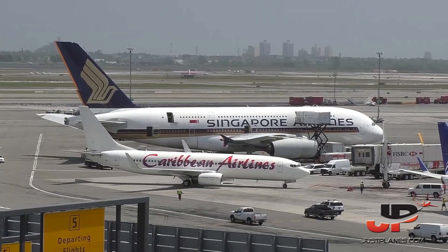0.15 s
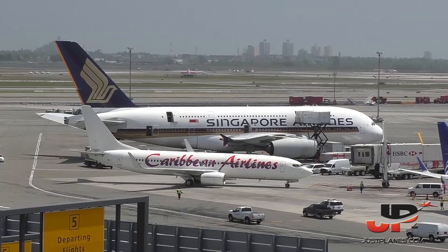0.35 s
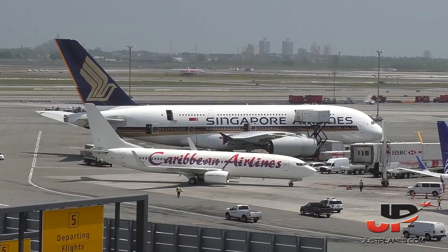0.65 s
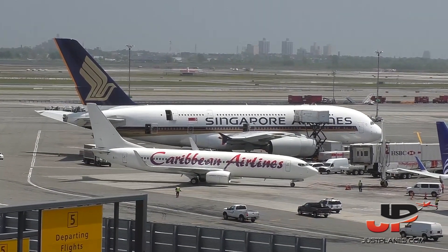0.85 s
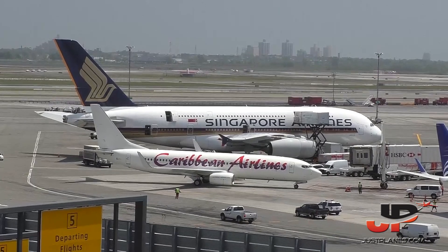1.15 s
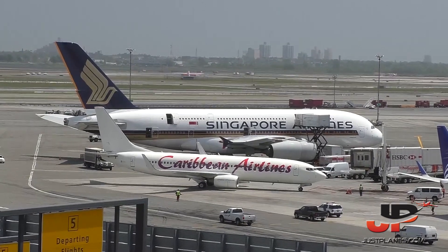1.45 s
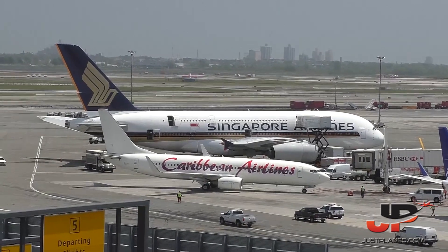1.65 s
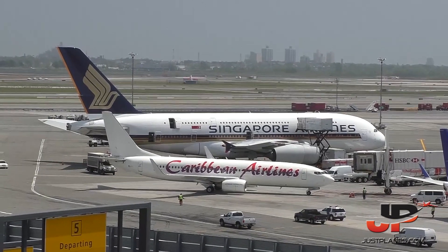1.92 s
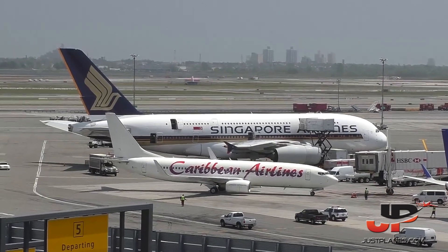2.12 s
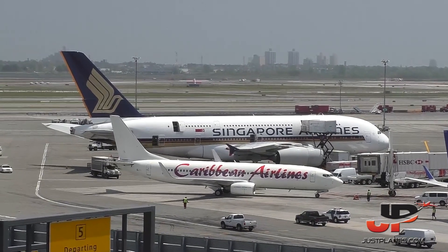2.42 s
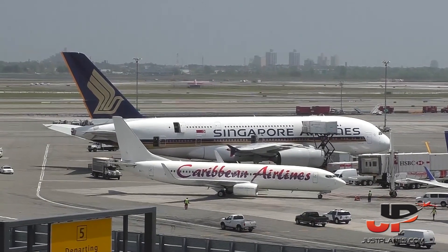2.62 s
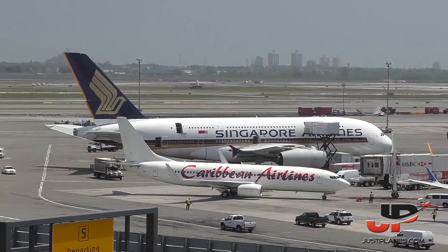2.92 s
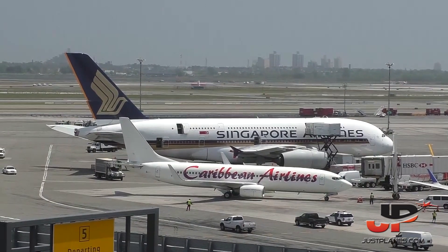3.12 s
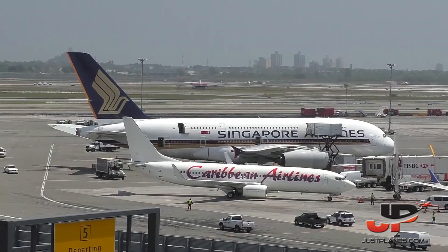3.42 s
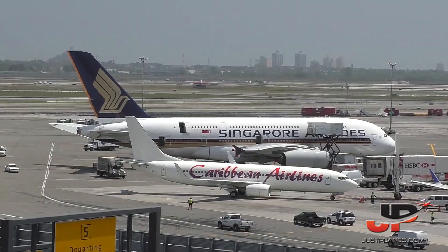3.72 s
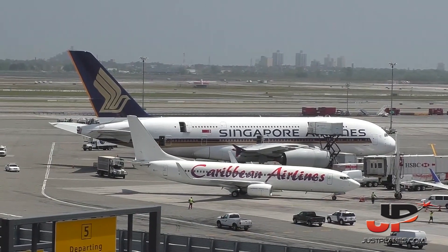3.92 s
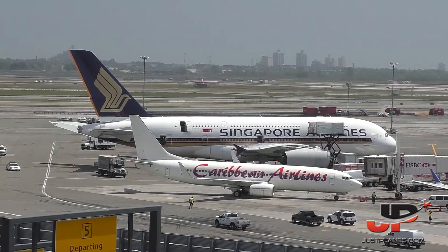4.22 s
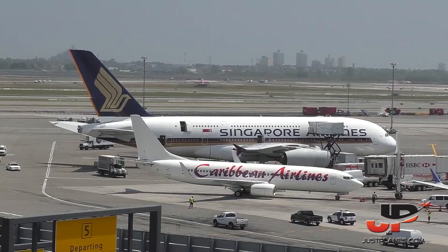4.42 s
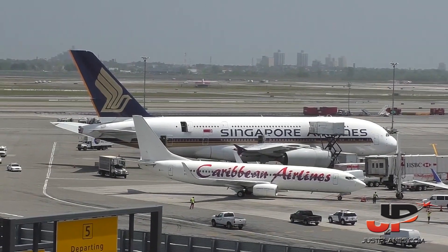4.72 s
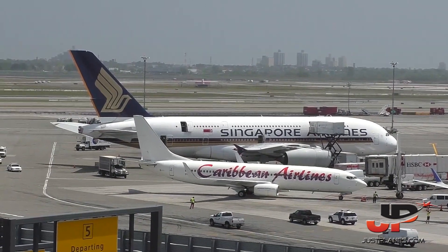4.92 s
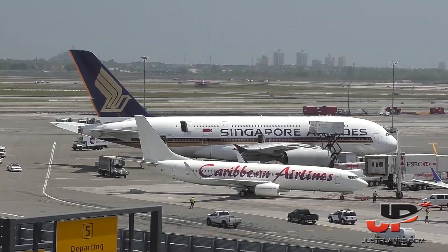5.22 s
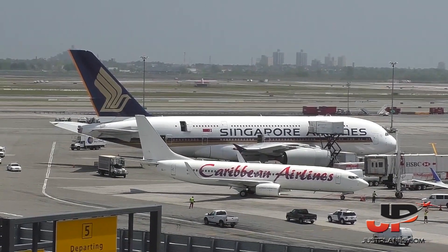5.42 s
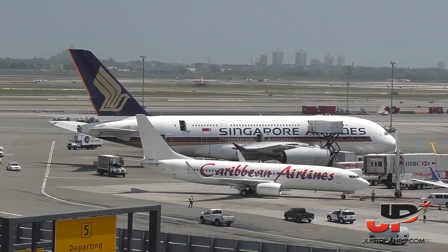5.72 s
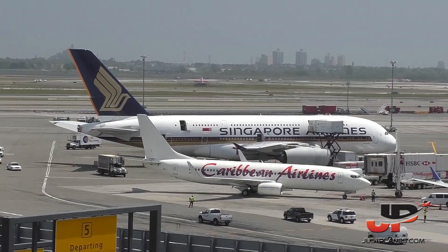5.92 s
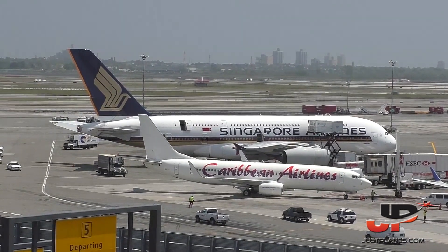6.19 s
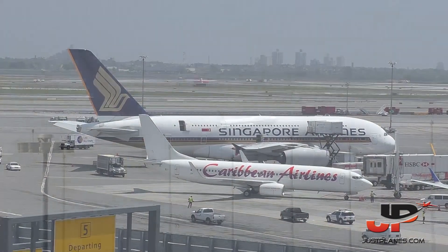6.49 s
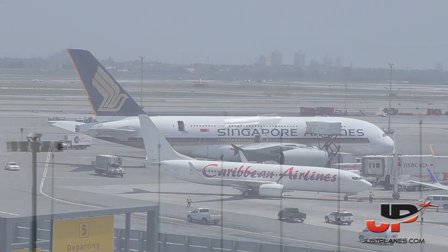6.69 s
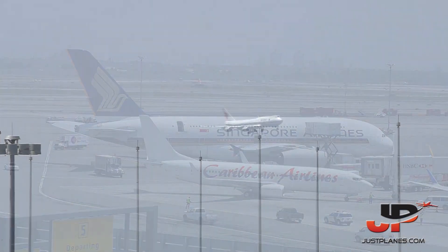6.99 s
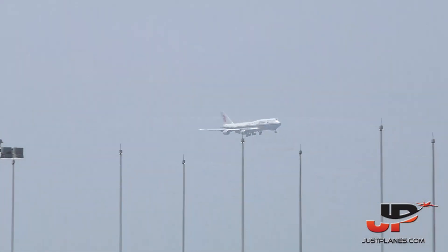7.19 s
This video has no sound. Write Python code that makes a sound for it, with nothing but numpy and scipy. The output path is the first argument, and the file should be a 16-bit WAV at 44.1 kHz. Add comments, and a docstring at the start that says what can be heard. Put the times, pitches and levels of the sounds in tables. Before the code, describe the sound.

From 0 s, a wide stereo jet roar fills an open airport apron, heard from a high terrace: low-mid rumble under broad hiss, with a blurred, flickering fan whine near 5.7 kHz and a faint tone near 800 Hz that swells around 1.2, 2.2 to 3.2, 3.7 and 5.6 s. Wind constantly buffets the microphone with very low swings, flutter and thumps, including hard slaps near 0.3, 1.0, 2.4, 3.0, 4.0 to 4.9 and 5.8 s. Tiny electrical pulse buzzes flick by at 0.19 and 4.81 s, stronger on the right. The roar wavers slightly, dips around 4.4 and 5.1, and grows fuller and brighter from 5.2 to 6.3 s as wind eases. Barely audible ticks come at 6.6. From 6.8 to 7.1 s everything dissolves into quieter, duller distant runway noise with a steady drone near 330 Hz, lasting to about 7.3 s.

```python
"""On a high terrace above an airport apron, jets idle and taxi: a broad roar, a blurred fan whine, a faint tone.
Shaped noise makes the roar, noise on a drifting pitch the whine, a wavering sine the tone.
Wind buffets the microphone in low noise and single slaps; two radar passes buzz in the wiring as pulse trains.
The camera adds noise ticks and thin wavering sines; two short, faint sines sound near 11.3 kHz.
At the end the apron dissolves into a quieter, duller far runway with a drone."""
import sys
import numpy as np
from scipy import signal
from scipy.fft import rfft, irfft, next_fast_len
from scipy.io import wavfile
from scipy.ndimage import uniform_filter1d, map_coordinates

SR = 44100
rng = np.random.default_rng(int(sys.argv[2]) if len(sys.argv) > 2 else 0)


def file_out(sig):
    """Save sig as 16-bit WAV at sys.argv[1]."""
    # one column per channel
    cols = np.atleast_2d(sig).T
    # limit, then scale
    lim = np.clip(cols, -1, 1)
    pcm = np.round(lim * 32767).astype(np.int16)
    wavfile.write(sys.argv[1], SR, pcm)


N = 324135  # length in samples

# Jet levels: (time [s], roar before brightening [dB], lift of its upper part [dB], fan whine before flicker [dB])
JET_LEVELS = [(0, -32.5, 2, -54), (.22, -32, -1, -46), (.45, -34, 1.2, -46), (.62, -33.5, 2, -54),
              (1.0, -33.5, 1.7, -50.5), (1.11, -35.5, 3, -45.5), (1.16, -34, 1.5, -55),
              (1.21, -32.5, 1, -46), (1.3, -32.5, 0, -56), (1.4, -32.5, 1.5, -47.5), (1.8, -33, 1.9, -49.5),
              (2.03, -33.5, 0.3, -54), (2.14, -32, 0, -50.5), (2.26, -33.5, 1.5, -53.5),
              (2.33, -31.5, 0.5, -47.5), (2.5, -31.5, 1.5, -53), (2.63, -31, 0.5, -47),
              (2.72, -31.5, 0, -51), (2.88, -32.5, 0, -46), (3.07, -32, -1, -56), (3.25, -31.5, 1, -51),
              (3.37, -30.5, -0.5, -46), (3.45, -33, 1, -49.5), (3.68, -31, 0, -47), (3.8, -31.5, 0, -50),
              (4.13, -32.5, 1.5, -47.5), (4.32, -31, -0.2, -48), (4.44, -35, 3, -62.5),
              (4.59, -31.5, 1.5, -50), (4.7, -33.5, 2.5, -61), (4.78, -31, 1.5, -52), (4.86, -33.5, 3, -60),
              (5.03, -34.5, 4, -53), (5.1, -33.5, 3, -63), (5.22, -31, 3, -47.5), (5.38, -32.5, 2, -51),
              (5.55, -29.5, 3.5, -50.5), (5.68, -32, 2, -45.5), (5.76, -30, 2.5, -49), (5.9, -31, 3, -53.5),
              (6.1, -29.5, 2.5, -48.5), (6.3, -30.5, 2.5, -49), (6.45, -31, 1, -48.5), (6.6, -31, -1, -47),
              (6.8, -34.5, 1, -54.5), (6.9, -34.5, -2.5, -56), (7.0, -38.5, 0, -58), (7.1, -38.5, -8, -69)]
# Spectrum shape of the roar: (frequency [Hz], relative level [dB per Hz])
ROAR_SPECTRUM = [(50, -44), (130, -3), (250, -0.5), (330, 1), (480, -1.5), (650, -6), (1000, -5),
                 (1250, -8.5), (1550, -8.5), (1750, -15), (2000, -10.5), (2500, -15.5), (2630, -14),
                 (2760, -15.5), (3100, -18), (4500, -29), (6800, -34), (8200, -45), (9500, -48.5),
                 (9800, -42), (10100, -45.5), (11200, -44.5), (12000, -53.5), (12600, -78.5), (13000, -110)]
# Blade tones smeared by turbulence: (offset from the centre [Hz], width [Hz], relative level [dB])
WHINE_BANDS = [(60, 900, -3), (-300, 2350, -5.5)]
# Shaft tone before its wobble: (time [s], level [dB])
TONE_LEVEL = [(0, -55), (.12, -50), (.3, -57), (1.05, -54), (1.22, -45), (1.42, -55), (2.02, -55),
              (2.2, -46.5), (2.38, -50), (2.55, -46), (2.85, -49.5), (3.1, -47.5), (3.4, -54),
              (3.62, -44.5), (3.8, -46.5), (4.0, -57), (5.42, -57), (5.62, -47.5), (5.85, -54), (6.5, -56),
              (7.0, -62)]
SURGE_DB = .3  # chance swells of the roar
WHINE_HZ, WANDER_HZ, WANDER_PER_S = 5736, 55, 9  # centre of the fan whine; size and rate of its drift
TONE_HZ = 814

# Wind before the gust rises are added: (time [s], slow pressure swings [dB], thumps [dB])
WIND_LEVELS = [(0, -20, -28.5), (.3, -19.5, -35), (.48, -29, -32), (.68, -22, -28), (1.1, -22, -28),
               (1.7, -24.5, -30), (1.92, -16.5, -33.5), (2.2, -21, -31), (2.5, -21.5, -35),
               (2.95, -27.5, -29), (3.4, -18.5, -29), (3.6, -23, -36.5), (4.0, -18.5, -29),
               (4.4, -20.5, -28.5), (4.9, -21.5, -28), (5.2, -24.5, -29.5), (5.5, -21, -33),
               (5.7, -18, -36), (5.97, -29, -31), (6.12, -22.5, -37), (6.35, -32.5, -43.5),
               (7.35, -46, -46.5)]
# Flutter before the gust rises are added: (time [s], level [dB])
FLUTTER_LEVEL = [(0.0, -49), (0.23, -33), (0.94, -34), (1.01, -27.5), (1.05, -36.5), (1.26, -34),
                 (2.55, -38.5), (2.67, -31), (3.1, -28.5), (3.28, -46), (3.33, -32), (3.67, -43.5),
                 (3.71, -39.5), (4.78, -37), (6.31, -45), (6.4, -46.5)]
# Hardest gusts: (centre [s], length [s], rise of the thumps [dB], rise of the swings [dB])
GUST_RISES = [(0.31, 0.16, 4.5, 3.5), (0.725, 0.15, 5, 4), (1.04, 0.065, 1.5, 4), (2.166, 0.055, 4.5, 7),
              (2.449, 0.047, 13.5, 3), (2.694, 0.099, 2.5, 6.5), (2.83, 0.094, 5.5, 6.5),
              (3.028, 0.056, 0, 3), (3.382, 0.13, 6, 4.5), (3.736, 0.18, 6, 0), (4.004, 0.15, 5, 2.5),
              (4.248, 0.085, 5.5, -2.5), (4.414, 0.1, 2, 3.5), (4.679, 0.057, 1.5, 3),
              (4.941, 0.063, 4.5, 5.5), (5.218, 0.033, 6, 4.5), (5.329, 0.069, 0.5, 7.5),
              (5.624, 0.091, 0, 2.5), (5.846, 0.059, 4, 2)]
# Spectrum shapes of the three wind layers: (frequency [Hz], relative level [dB per Hz])
SWING_SPECTRUM = [(2, -25), (8, 1), (18, 0), (28, -1.5), (40, -7), (55, -17), (80, -30), (200, -120)]
THUMP_SPECTRUM = [(15, -120), (33, -19), (46, -0.5), (70, -2), (95, -10.5), (130, -27), (250, -60),
                  (1500, -120)]
FLUTTER_SPECTRUM = [(50, -59.5), (85, -4.5), (110, -1), (150, -9.5), (220, -13), (500, -51), (1500, -120)]
# Single eddies hitting the microphone: (time [s], envelope peak [dB], starting pitch [Hz])
EDDY_SLAPS = [(.241, -13.5, 72.3), (.328, -15.5, 78.3), (.758, -17, 47.9), (.902, -18.5, 50),
              (1.0, -11, 59.8), (1.205, -21.5, 74.6), (2.435, -14.5, 67.9), (2.68, -15, 70.4),
              (2.99, -10.5, 55.9), (3.39, -14, 50), (3.722, -16, 52), (3.989, -14.5, 50), (4.05, -16.5, 67),
              (4.19, -15, 57.8), (4.309, -14.5, 52.2), (4.40, -14, 51.7), (4.679, -15.5, 57.2),
              (4.826, -13, 79.7), (4.895, -16, 55.6), (5.809, -12, 62.3)]
SLAP_CYCLES, SLAP_SINKS = 1.74, 0.54  # life in cycles of the starting pitch; share of the pitch lost in the end
LULL_DB, LULLS_PER_S = 1, 12  # depth and rate of chance dropouts in the swings
FLUTTER_SHARE = 0.19  # the flutter's part of a gust's rise in the thumps
LUMPS_DB = 3  # lumpiness of thumps and flutter
OVERLOAD = .38  # ceiling on the wind's push, full scale = 1

# Radar beam passes: (first pulse of a fast run [s], beam centre [s], beam width [s], peak before colouring [dB])
BEAM_PASSES = [(.17927, .1875, .009, -32), (4.80386, 4.811, .008, -32.5)]
# Pulse rates of the radar: (slow [Hz], fast [Hz])
PULSE_RATES = (973.5, 1249)
# Colour of the picked-up pulses: (frequency [Hz], gain [dB])
PULSE_COLOUR = [(2000, -27), (6000, 3), (9000, 1), (12000, 2), (15500, 0.5)]

# Camera ticks: (time [s], starting level before the treble filter [dB])
TICKS = [(6.5955, -54), (6.607, -44)]
# Thin high whine before its flicker: (frequency [Hz], level [dB])
THIN_WHINE = [(13846, -91.5), (13964, -90)]
# Short high sines: (time [s], length [s], pitch [Hz], level at the crest [dB])
HIGH_SINES = [(1.923, 0.17, 11240, -73.5), (2.703, 0.14, 11300, -71.5)]

# Far runway: (time [s], level [dB])
RUNWAY_LEVEL = [(6.0, -73), (6.4, -70), (6.75, -54), (6.9, -41.5), (7.1, -39), (7.35, -39)]
# Spectrum shape of the far runway: (frequency [Hz], relative level [dB per Hz])
RUNWAY_SPECTRUM = [(15, -14), (60, -14), (200, -5), (300, -4.5), (450, -8), (900, -13), (1500, -17.5),
                   (2200, -26), (3300, -34.5), (4500, -43), (6000, -45.5), (8400, -49), (11000, -58),
                   (15700, -59.5)]
# A far engine's drone: (pitch [Hz], level once the runway is fully up, before its wobble [dB])
DRONE = (330.5, -46)

# Likeness of the two channels: (frequency [Hz], correlation [0-1])
LIKENESS = [(10, .98), (45, .94), (170, .88), (300, .93), (860, .97), (1900, .9), (3300, .86), (4300, .73),
            (5800, .9), (6900, .57), (8300, 1)]
# How far left leads right, before each source takes its share: (frequency [Hz], phase [rad])
LEFT_LEAD = [(14, 0), (50, .28), (200, 0), (500, .2), (1200, .23), (1550, .55), (1900, .2), (2400, .85),
             (2900, .62), (4300, 1.3), (5700, 1.43), (7000, 2.1), (8300, np.pi)]
# Left level over right: (frequency [Hz], balance [dB])
LEFT_BALANCE = [(10, .4), (35, 0), (130, -2.6), (250, -1.4), (860, -.8), (1550, -1.4), (1900, .5),
                (2240, -1.8), (2580, 2), (2900, -.3), (7000, -.2), (8300, 0)]
TOP_HZ = 15750  # upper band limit


def amp(db):
    """Gain of a level in dB."""
    return 10 ** (np.asarray(db) / 20)


def unit(x):
    """x at rms 1."""
    return x / np.sqrt(np.mean(x ** 2) + 1e-20)


def along(points, hz):
    """Read a (frequency, value) curve on a log frequency axis."""
    f, v = np.transpose(points)
    return np.interp(np.log(hz + 1), np.log(f + 1), v)


def curves(rows):
    """One value per sample for each column after the time."""
    s, *columns = np.transpose(rows)
    return [np.interp(np.arange(N) / SR, s, column) for column in columns]


def wobble(rate):
    """A smooth random curve with rate knots a second."""
    knots = rng.standard_normal(int(N * rate / SR) + 4)
    coarse = np.arange(0, N + 32, 32)
    return np.interp(np.arange(N), coarse, map_coordinates(knots, [coarse * rate / SR]))


def wavering(hz, spread_hz, rate):
    """A sine of rms 1 whose pitch wanders."""
    phase = 2 * np.pi * np.cumsum(hz + spread_hz * wobble(rate)) / SR
    return np.sqrt(2) * np.sin(phase)


def filtered(x, response):
    """x through a complex frequency response."""
    m = next_fast_len(N + 8192)
    return irfft(rfft(x, m) * response(np.fft.rfftfreq(m, 1 / SR)), m)[..., :N]


def above(x, corner_hz):
    """x with the part below the corner rolled off."""
    return filtered(x, lambda hz: 1 / (1 + (corner_hz / (hz + 1)) ** 4))


def rush(gain, patchy_db):
    """Two noises at a joint rms of 1 with shared patches of random gain, as moving air scatters sound."""
    z = signal.stft(rng.standard_normal((2, N)), nperseg=512)[2]
    field = uniform_filter1d(rng.standard_normal(z.shape[1:]), size=6, axis=0)
    field = uniform_filter1d(field, size=14, axis=1)
    pair = signal.istft(z * amp(patchy_db * unit(field)), nperseg=512)[1][:, :N]
    return unit(filtered(pair, gain))


def shaped_rush(spectrum, patchy_db):
    """A patchy noise pair with the given spectrum shape."""
    return rush(lambda hz: amp(along(spectrum, hz)), patchy_db)


def evened(x, seconds):
    """x with its chance swells longer than the given time largely levelled out."""
    power = np.abs(uniform_filter1d(x[0] ** 2, round(seconds * SR)))
    return unit(x / np.sqrt(power + .05))


def roar(level_db, bright_db):
    """Exhaust roar: broad turbulent noise whose upper part brightens and dulls."""
    noise = shaped_rush(ROAR_SPECTRUM, patchy_db=0.4)
    upper = above(noise, 1700)
    return amp(level_db + SURGE_DB * wobble(11)) * (noise + (amp(bright_db) - 1) * upper)


def fan_whine(level_db):
    """Blade tones smeared by turbulence: slow noise carried on a moving pitch gives a wandering band."""
    centre_hz = WHINE_HZ + WANDER_HZ * wobble(WANDER_PER_S)
    band = 0
    for offset_hz, width, db in WHINE_BANDS:
        spread = lambda f: 1 / (1 + (2 * f / width) ** 2) ** 2
        phase = 2 * np.pi * np.cumsum(centre_hz + offset_hz) / SR
        in_phase = rush(spread, patchy_db=-2.0) * np.cos(phase)
        quadrature = rush(spread, patchy_db=3.0) * np.sin(phase)
        band += amp(db) * (in_phase + quadrature)
    # the whine flickers most: short waves scatter strongly in hot, moving air
    flicker_db = 2.1 * np.tanh(0.31 * wobble(21) + 0.94 * wobble(35))
    return amp(level_db + flicker_db) * unit(band)


def shaft_tone():
    """One shaft's tone: a sine with a slightly wavering pitch and level."""
    return amp(curves(TONE_LEVEL)[0] + 1.5 * wobble(9.0)) * wavering(TONE_HZ, spread_hz=1, rate=6)


def jets():
    """Roar, whine and tone of the jets, sinking as the apron dissolves."""
    roar_db, bright_db, whine_db = curves(JET_LEVELS)
    dissolve = curves([(6.85, 1.0), (7.15, 0.25)])[0]
    # the tone feeds only the first of the pair; ports() spreads it
    return dissolve * (roar(roar_db, bright_db) + fan_whine(whine_db) + shaft_tone() * [[1], [0]])


def slaps():
    """An eddy bursts on the port: a sharp push or pull that sinks in pitch and is gone in a few cycles."""
    out, t = np.zeros(N + SR), np.arange(SR // 4) / SR
    for s, db, hz in EDDY_SLAPS:
        age = t * hz / SLAP_CYCLES
        turns = SLAP_CYCLES * (age - SLAP_SINKS * (age - 1 + np.exp(-age)))
        envelope = 2 * np.e * age * np.exp(-2 * age)  # peaks at 1
        sign = rng.choice([-1, 1])
        out[round(s * SR):][:len(t)] += sign * amp(db) * envelope * np.cos(2 * np.pi * turns)
    return out[:N]


def wind():
    """Pressure swings, thumps, eddy flutter and slaps; gusts shift the first three, the strongest push is rounded."""
    t = np.arange(N) / SR
    swing_db, thump_db = curves(WIND_LEVELS)
    flutter_db, = curves(FLUTTER_LEVEL + [(7.2, -65)])
    swing_db = swing_db + LULL_DB * (1 - wobble(LULLS_PER_S) ** 2)
    for s, length, thump_rise_db, swing_rise_db in GUST_RISES:
        gust = np.exp(-.5 * (2 * (t - s) / length) ** 2)
        swing_db = swing_db + swing_rise_db * gust
        thump_db = thump_db + thump_rise_db * gust
        flutter_db = flutter_db + FLUTTER_SHARE * thump_rise_db * gust
    flutter = evened(shaped_rush(FLUTTER_SPECTRUM, patchy_db=1.0), seconds=0.13)
    swings = evened(shaped_rush(SWING_SPECTRUM, patchy_db=0.5), seconds=0.12)
    thumps = evened(shaped_rush(THUMP_SPECTRUM, patchy_db=0.5), seconds=0.09)
    lumps = amp(LUMPS_DB * wobble(16))
    push = amp(swing_db) * swings
    push = push + amp(thump_db) * unit(lumps * thumps)
    push = push + amp(flutter_db) * unit(lumps * flutter)
    push = push + slaps() * [[1], [.5]]
    return push / (1 + np.abs(push / OVERLOAD) ** 4) ** (1 / 4)


def radar():
    """The turning beam induces its pulses in the wiring: ten fast ones, ten slow ones, and so on."""
    out, n, k = np.zeros(N), np.arange(-2048, 2048), np.arange(-30, 40)
    slow, fast = PULSE_RATES
    ends = np.cumsum(np.where(k % 20 < 10, 1 / fast, 1 / slow))
    offsets = ends - ends[k == -1]
    for s, centre, width, db in BEAM_PASSES:
        size = amp(db) * np.exp(-.5 * ((s + offsets - centre) / width) ** 2)
        at = round(s * SR)
        # sinc pulses can fall between samples
        out[at + n] += size @ np.sinc(at + n - (s + offsets)[:, None] * SR)
    coloured = filtered(out, lambda hz: amp(along(PULSE_COLOUR, hz)))
    return coloured * amp([[-3.1], [3.1]])  # stronger on the right


def camera():
    """Faint ticks as dying bursts of bright noise, and a thin flickering whine of wavering sines."""
    t, click = np.arange(200) / SR, np.zeros(N)
    for s, db in TICKS:
        burst = amp(db - 60 * t / 0.0052) * rng.standard_normal(200)  # falls 60 dB in 5.2 ms
        click[round(s * SR):][:200] += burst
    out = above(click, 6000)
    for hz, db in THIN_WHINE:
        out += amp(db + 4 * wobble(25)) * wavering(hz, spread_hz=6, rate=30)
    return out


def high_sines():
    """Two short, faint sines near 11.3 kHz with fast random pitch under a rounded swell."""
    t, out = np.arange(N) / SR, np.zeros(N)
    for s, length, hz, db in HIGH_SINES:
        swell = np.sqrt(np.abs(np.sin(np.pi * np.clip((t - s) / length, 0, 1))))
        out += amp(db) * swell * wavering(hz, spread_hz=60, rate=250)
    return out


def runway():
    """Distant traffic and a drone: air has taken the treble away."""
    hz, db = DRONE
    level_db = curves(RUNWAY_LEVEL)[0]
    drone = amp(db - level_db[-1] + wobble(8)) * wavering(hz, spread_hz=.6, rate=6)
    traffic = shaped_rush(RUNWAY_SPECTRUM, patchy_db=-2.0)
    return amp(level_db) * (traffic + drone * [[1], [0]])


def ports(pair, lead_share):
    """Two unrelated sounds mixed as the two microphone ports hear a wide source."""
    side = np.array([[1], [-1]])  # left, right
    turn = lambda hz: np.arccos(np.clip(along(LIKENESS, hz), 0, 1)) / 2
    near, across = filtered(pair, lambda hz: np.array([np.cos(turn(hz)), np.sin(turn(hz))]))
    balance = lambda hz: amp(side * along(LEFT_BALANCE, hz) / 2)
    lead = lambda hz: np.exp(side * .5j * lead_share * along(LEFT_LEAD, hz))
    return filtered(near + side * across, lambda hz: balance(hz) * lead(hz))


def scene():
    """Jets, wind and runway at the two ports, with radar, camera and high sines added directly."""
    close = ports(jets() + wind(), lead_share=0.98)
    far = ports(runway(), lead_share=0.54)
    return close + radar() + camera() + high_sines() + far


def record(dry):
    """The camera keeps nothing above its band limit."""
    return filtered(dry, lambda hz: hz < TOP_HZ)


dry = scene()
out = record(dry)
file_out(out)
```